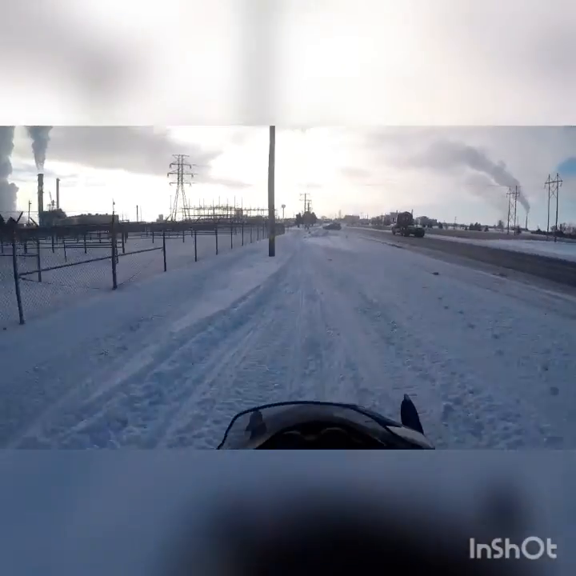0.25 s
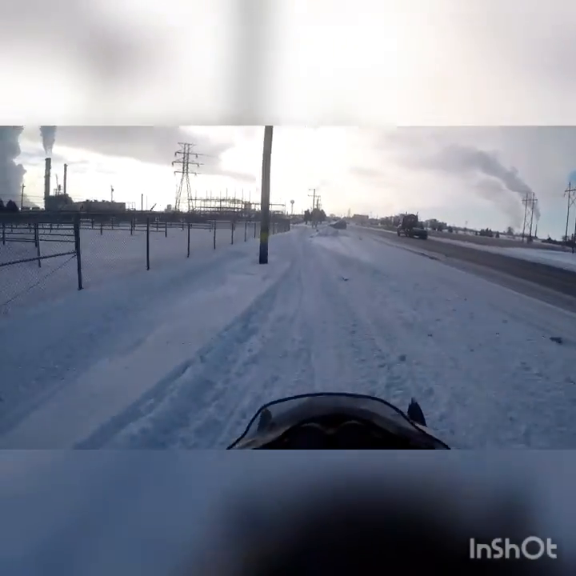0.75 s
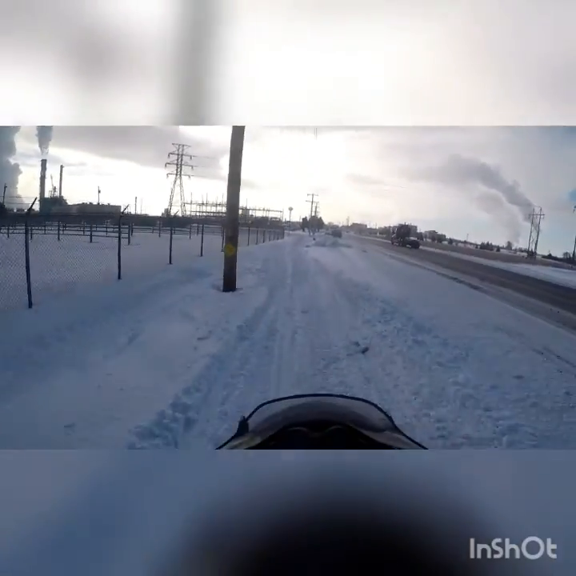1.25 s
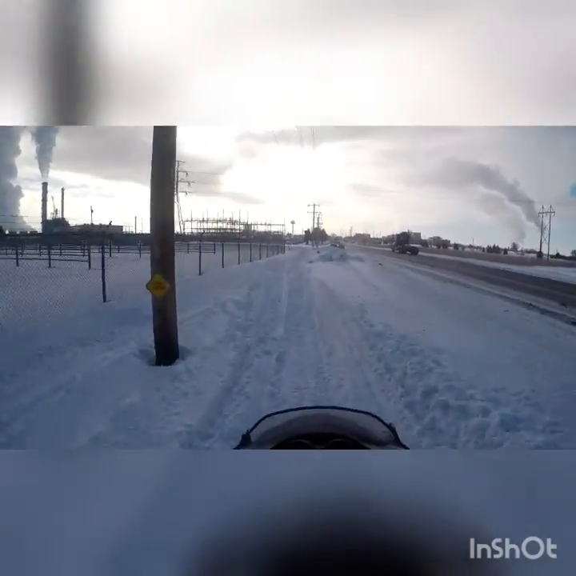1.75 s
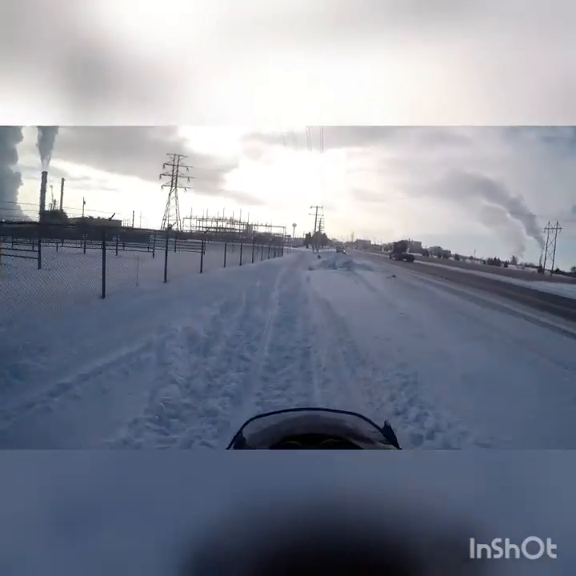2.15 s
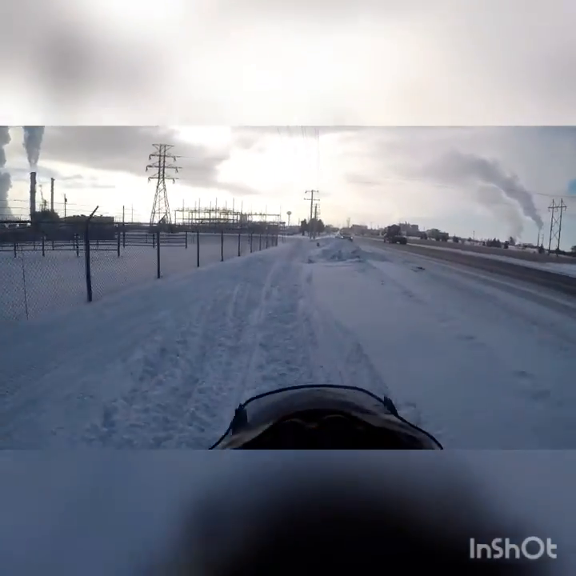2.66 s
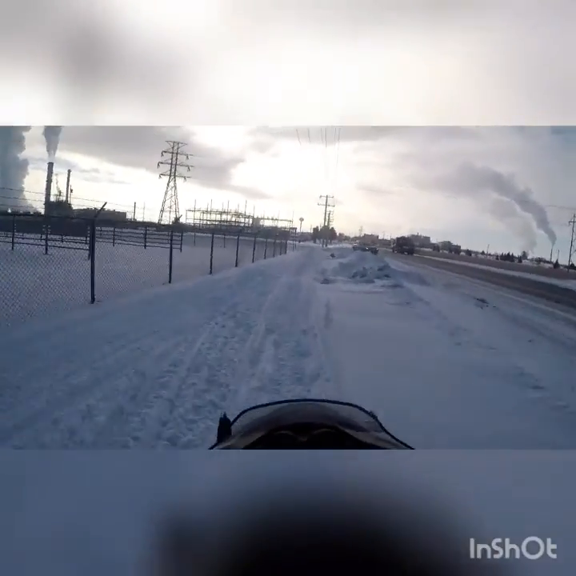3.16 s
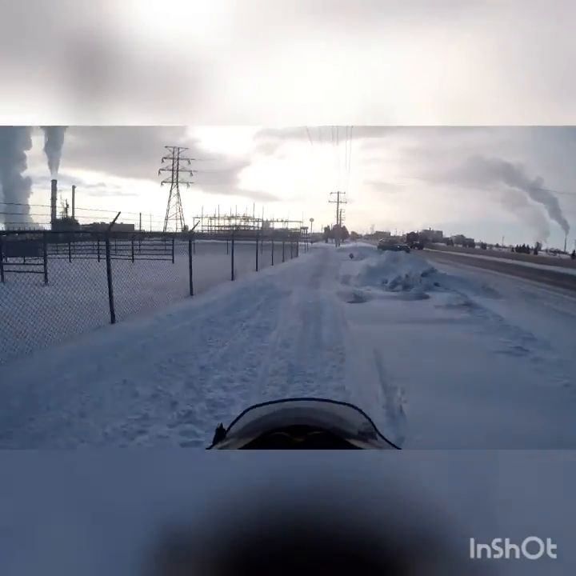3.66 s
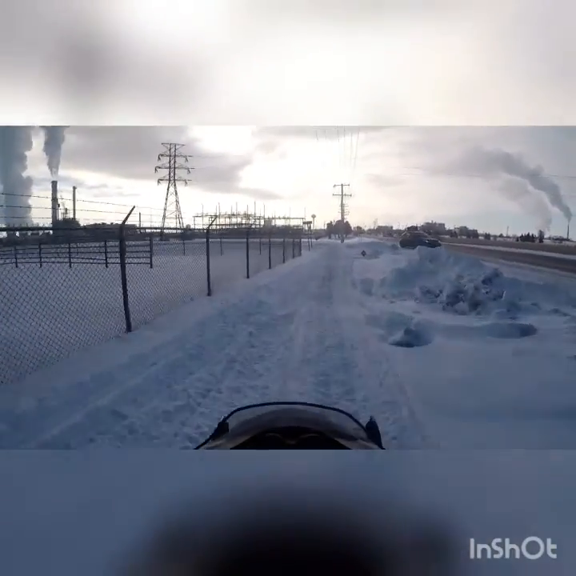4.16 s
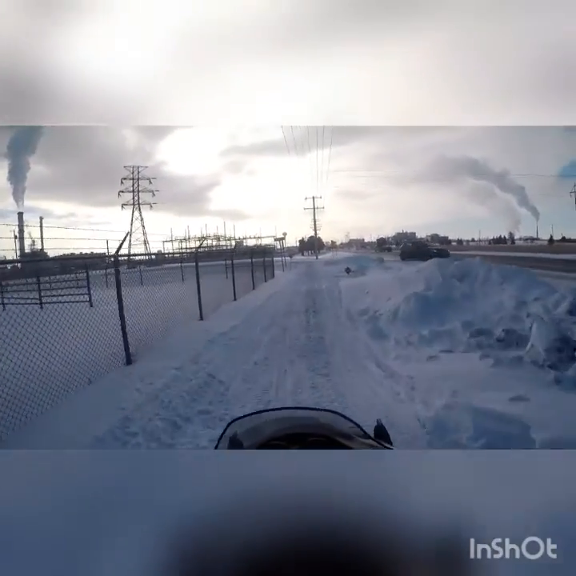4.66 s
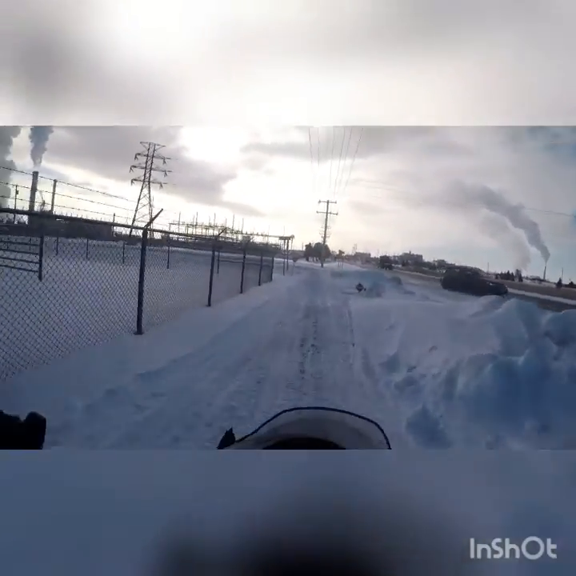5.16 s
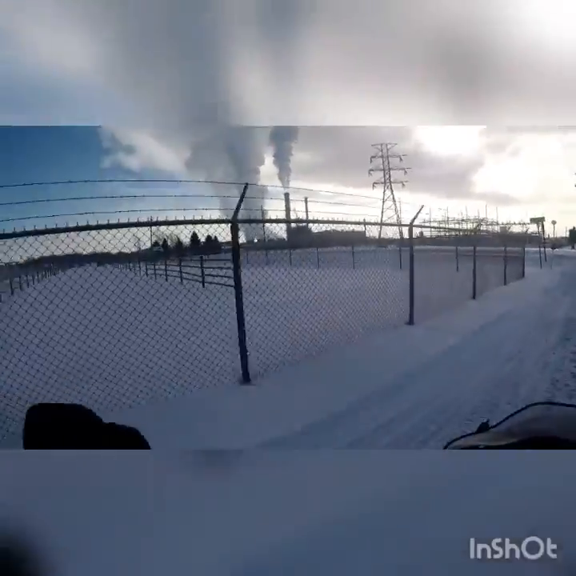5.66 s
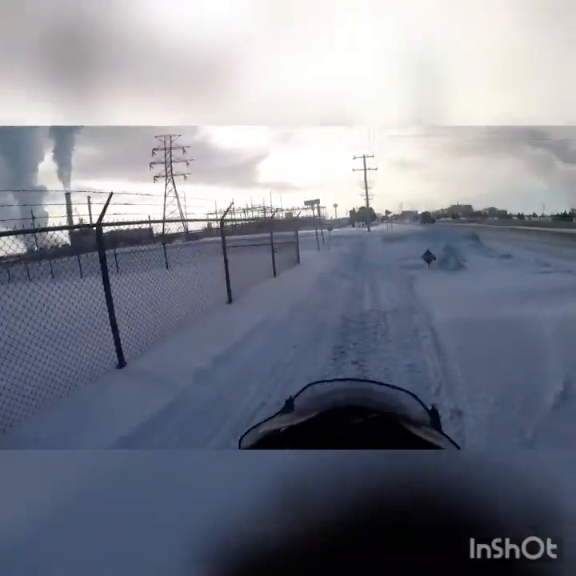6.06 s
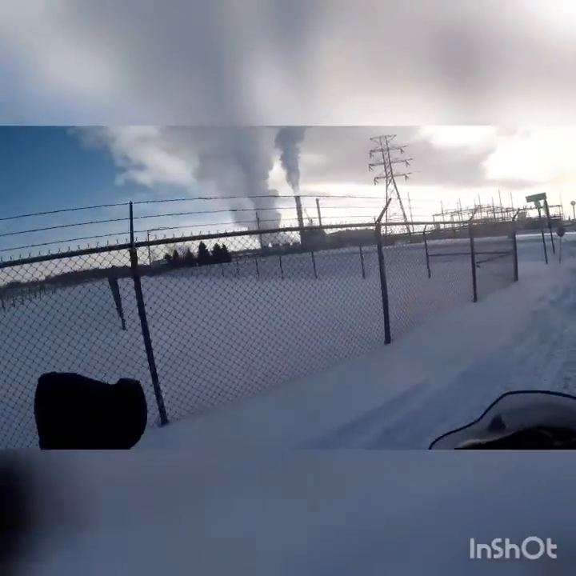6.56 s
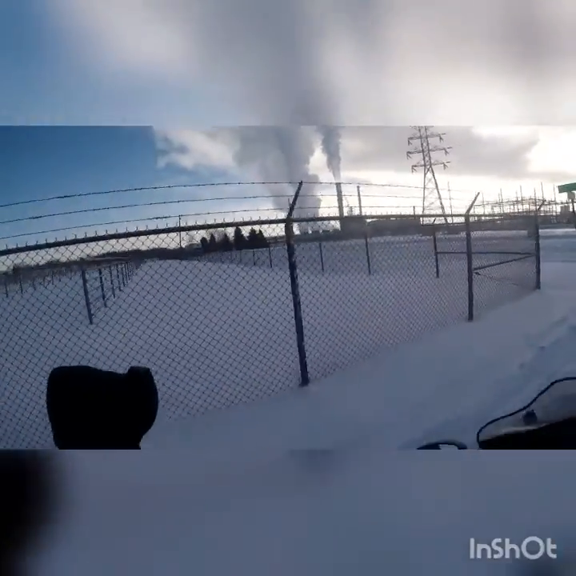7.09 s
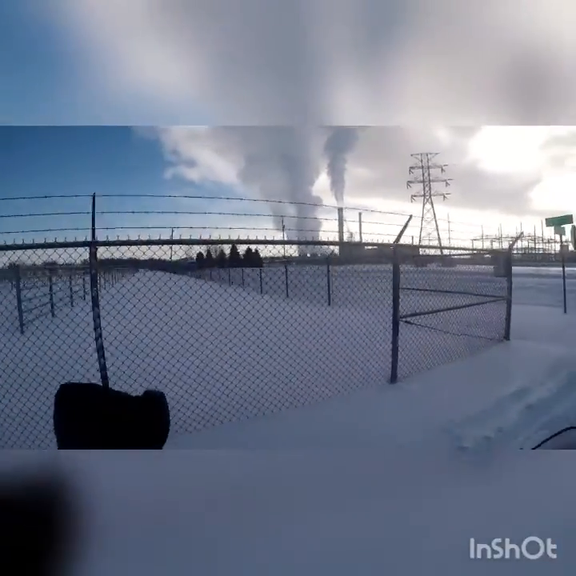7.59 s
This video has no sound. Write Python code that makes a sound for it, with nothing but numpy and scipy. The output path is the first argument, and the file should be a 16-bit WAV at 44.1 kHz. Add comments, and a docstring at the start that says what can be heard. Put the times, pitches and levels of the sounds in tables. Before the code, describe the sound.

Close onboard sound of a snowmobile on an open snowy trail. At first a thin, quiet, centred engine hum with faint track whine, rattle and snow hiss. Just after three seconds it opens into loud, wide stereo: the low exhaust throbs about ten times a second, the track clatters and clacks, and wind gusts rumble on the rider's microphone.

```python
"""A snowmobile's exhaust drones and throbs along a packed trail, heard close, from a camera worn by the rider.
The exhaust is a wavering near-sine firing note; the track adds noisy rattle, lug-locked whine and clacks.
Grainy noise hisses under the skis, brief low booms mark bumps, and gusts of low noise buffet the camera.
For three seconds the sound is thin and centred; then it opens into loud, wide stereo."""
import sys
import numpy as np
from scipy import signal
from scipy.fft import rfft, irfft, next_fast_len
from scipy.io import wavfile

SR = 44100
rng = np.random.default_rng(int(sys.argv[2]) if len(sys.argv) > 2 else 0)


def materialize(psi):
    """Save the field psi as 16-bit PCM at rate SR to the path in sys.argv[1].

    A 1-D psi becomes a single channel; in a 2-D psi each row is a channel.
    """
    bounded = np.clip(np.atleast_2d(psi).T, -1, 1)
    quanta = np.round(bounded * 32767).astype(np.int16)
    wavfile.write(sys.argv[1], SR, quanta)


N = 345303
TIME = np.arange(N) / SR
BIN_HZ = np.maximum(np.fft.rfftfreq(next_fast_len(N, True), 1 / SR), 1)

# Engine pitch, dipping and rising with the throttle: time_s, firing_hz
FIRING_PITCH = [(0, 113.8), (.75, 120.7), (1.4, 117.3), (1.87, 126.2), (2.13, 115.9), (2.4, 120.5),
                (3.3, 110.6), (3.9, 115.1), (4.27, 113.2), (4.6, 117.6), (5.0, 117), (5.23, 105.5),
                (5.45, 119.8), (5.7, 114), (5.97, 115.5), (6.27, 119.9), (6.5, 109.2), (6.9, 112.1),
                (7.25, 109.8), (7.83, 112)]
# Engine effort, before the thin or wide trim: time_s, level_db
ENGINE_EFFORT = [(0, -45), (1.65, -43), (1.9, -33.5), (2.25, -38), (2.9, -35.5), (3.33, -43.5),
                 (3.5, -26.5), (3.75, -28.5), (4.1, -23), (5.5, -22), (6.7, -21), (7.25, -20.5),
                 (7.83, -24)]


def exhaust(thin_db, wide_db, side_db, side_lag, second_db, half_db, idle_wobble, loud_wobble, idle_uneven_db):
    """A near-sine firing note with a faint half-order; it wavers while quiet, then firms up and throbs."""
    loud = opening()
    firing_hz, = in_time(FIRING_PITCH)
    effort_db, = in_time(ENGINE_EFFORT)
    wobble = idle_wobble + loud * (loud_wobble - idle_wobble)
    phase = 2 * np.pi * np.cumsum(firing_hz) / SR + wobble * drift(18.4)
    note = throb() * np.exp(1j * phase)
    half = from_db(half_db) * np.cos(phase / 2)
    second = from_db(second_db) * note ** 2
    mid = np.real(note + second) + half
    lagging = np.real(note * np.exp(-1j * side_lag))
    side = loud * from_db(side_db) * (lagging + half)
    trim_db = thin_db + loud * (wide_db - thin_db)
    uneven_db = (1 - loud) * idle_uneven_db * drift(19)
    return from_db(effort_db + trim_db + uneven_db) * left_right(mid, side)


# The loud exhaust's separate throbs: start_s, strength_db, depth_db of the dip each one starts from
EXHAUST_THROBS = [(3.39, 0, -6), (3.667, -3, -14), (3.761, 0, -12), (3.859, 2, -9), (3.965, -3, -10),
                  (4.044, 2.5, -17), (4.38, -3.5, -21), (4.448, -3.5, -7), (4.541, -1, -17),
                  (4.665, 1, -24), (4.764, .5, -28), (4.86, -3, -10), (4.945, 0, -12), (5.036, 2, -19),
                  (5.225, 0, -8), (5.317, .5, -17), (5.419, -.5, -26), (5.5, -.5, -22), (5.582, 1.5, -12),
                  (5.676, -1, -28), (5.737, -1, -11), (5.819, -1, -18), (5.911, 0, -15), (5.993, -1, -20),
                  (6.109, 0, -14), (6.215, -1, -9), (6.323, -1, -28), (6.428, .5, -16), (6.538, .5, -16),
                  (6.644, .5, -14), (6.747, .5, -9), (6.862, -.5, -16), (7.003, -.5, -14), (7.107, .5, -15),
                  (7.206, .5, -14), (7.332, -1, -10), (7.45, -2, -6), (7.559, 0, -7), (7.675, .5, -11),
                  (7.85, 0, -8)]
THROB_ROUND = 1.5  # higher is a flatter crest


def throb():
    """Two tones beating: each throb is a round crest, and the note turns over in the dip between two."""
    start_s, strength_db, depth_db = np.transpose(EXHAUST_THROBS)
    count = np.interp(TIME, start_s, np.arange(len(start_s)))
    crest = np.tanh(THROB_ROUND * np.sin(np.pi * count)) / np.tanh(THROB_ROUND)
    # the dip sits a quarter turn from the crest, so the note never quite vanishes
    dip = from_db(np.interp(TIME, start_s, depth_db)) * np.cos(np.pi * count)
    beating = from_db(strength_db[count.astype(int)]) * crest + 1j * dip
    onset = np.clip(2 * count, 0, 1)  # steady before the first throb
    return (1 - onset) * 1j + onset * beating


# Track speed: time_s, lugs_per_s
TRACK_SPEED = [(0, 226.7), (.3, 215), (.6, 205), (1.4, 193.5), (1.75, 195.3), (1.95, 205.3), (2.2, 203.3),
               (2.5, 206.5), (3.1, 196), (3.7, 193.5), (4, 185.3), (4.8, 174), (5.65, 164.7), (6, 169),
               (6.4, 170.7), (6.8, 175.3), (7.5, 169.3), (7.83, 171.3)]
# Strength of the track's whine, before the rails' boost: time_s, gain_db
WHINE_STRENGTH = [(0, 3.5), (.5, -11.5), (1.5, -15), (1.95, 2.5), (2.55, -5), (3.05, 2), (3.8, -7.5),
                  (4.5, -4), (5.55, -4), (6.3, -5), (6.75, -3), (7.83, -6)]
RAIL_WHINE_DB = 2.7  # hull and rails carry the whine more than the tunnel does
FLUTTER_DB, FLUTTER_PER_S = 0.7, 30  # the flapping track shakes rails and clatter together
# Level of the tunnel over the track, before the thin or wide trim: time_s, level_db
TUNNEL_LEVEL = [(0, -43.5), (1.3, -45.5), (3.1, -47), (3.3, -42), (3.6, -32), (4.25, -29.5), (4.85, -29),
                (5.05, -27.5), (5.55, -33), (5.85, -32), (6.3, -31.5), (6.8, -35.5), (7.2, -33),
                (7.5, -35.5), (7.83, -32)]
# Ringing of the rails' main mode against the rest: time_s, contrast_db
RAIL_MODE = [(0, -6), (.2, 7), (.45, -1), (1.2, 0), (2.1, -3), (2.5, 3), (3.1, -7), (3.3, 2.5),
             (3.55, -1.5), (5.25, -3), (5.7, 9.5), (6.15, 2), (6.4, 9), (6.68, 3.5), (6.9, 3.5),
             (7.25, 6.5), (7.83, 1.5)]
# The clatter's two resonances: time_s, lower_gain_db (near 1750 Hz), upper_gain_db (near 3000 Hz)
CLATTER_MODES = [(0, 3, 0.5), (1.2, 0, 1.5), (2.5, 1, -1.5), (3.1, -1, 0), (3.5, 1.5, 3.5), (4.25, 2, 1),
                 (5.1, 2.5, 2), (5.5, -2, -2), (5.95, 1, -1), (6.5, -5.5, 0.5), (7.25, 1.5, 0),
                 (7.83, 0.5, -4)]
# Lugs drumming on hard snow: time_s, level_db
LUG_DRUMMING = [(0, -67), (3.1, -79), (3.22, -36), (3.45, -31), (3.7, -28.5), (3.85, -32), (4.35, -35),
                (4.7, -37), (7.83, -52.5)]
# Spectra of each part, thin and centred or wide: frequency_hz, relative_db (per Hz)
HULL_THIN_COLOUR = [(75, -0.5), (100, -2), (125, 4), (150, -2), (190, -6.5), (215, -11.5), (245, -6.5),
                    (290, -13)]
HULL_WIDE_COLOUR = [(60, 0), (80, -1), (100, 1.5), (120, -2), (140, 2), (165, -6), (200, -2.5),
                    (240, -11.5), (290, -20.5)]
TUNNEL_THIN_COLOUR = [(290, 3.5), (330, 1.5), (375, -0.5), (430, 1.5), (470, -4.5), (520, -3), (590, -5.5),
                      (660, -5.5), (760, -8.5), (860, -4)]
TUNNEL_WIDE_COLOUR = [(290, -18), (338, -17.5), (375, -19), (430, 2.5), (470, -5.5), (520, 0.5), (590, -16),
                      (660, -4), (740, -15), (860, -8)]
RAILS_THIN_COLOUR = [(860, -23.5), (930, -4), (1000, -4), (1060, 3), (1110, 5.5), (1170, 0.5), (1240, 4.5),
                     (1300, 0.5), (1360, -7), (1420, -14.5)]
RAILS_WIDE_COLOUR = [(860, -12.5), (900, -9.5), (950, -9.5), (1010, -5.5), (1060, -2.5), (1110, 4.5),
                     (1170, 1), (1240, -4), (1300, -0.5), (1360, -9), (1420, -9.5)]
CLATTER_THIN_COLOUR = [(1420, -4), (1500, 0.5), (1600, 1.5), (1700, 0.5), (1800, -3.5), (1950, -5),
                       (2150, -5), (2450, -9.5), (2700, -4), (2950, -9), (3150, -17.5), (3500, -12),
                       (3900, -18.5), (4300, -18)]
CLATTER_WIDE_COLOUR = [(1420, -5), (1500, 2.5), (1600, 0.5), (1700, 2), (1800, -8.5), (1950, -13),
                       (2150, -6), (2450, -11.5), (2700, -15), (2950, -9), (3150, -13), (3500, -23.5),
                       (3900, -23), (4300, -31.5)]


def track():
    """The track's rattle and whine pass into hull, tunnel and rails; slaps add clatter and the lugs drum."""
    slap_db, flutter_db = slaps(), FLUTTER_DB * drift(FLUTTER_PER_S)
    hull_db = part_level(quiet_db=-45.0, loud_db=-30.5, follows=0.59, uneven_db=-0.34)
    rails_db = part_level(quiet_db=-41.5, loud_db=-26.5, follows=0.89, uneven_db=0.63)
    rails_db = rails_db + 0.62 * slap_db + flutter_db
    clatter_db = part_level(quiet_db=-51.0, loud_db=-38, follows=0.67, uneven_db=0.97)
    clatter_db = clatter_db + slap_db + 1.05 * flutter_db
    ring_db = in_time(RAIL_MODE)[0] + 1.1 * drift(UNEVEN_PER_S)

    turns = np.cumsum(in_time(TRACK_SPEED)[0]) / SR  # lugs passed so far
    whine = from_db(in_time(WHINE_STRENGTH)[0]) * track_whine(turns, flicker_db=3.5, wander=0.26)
    blows = clacks()
    soft = rattle(turns, slap=0.13, flutter_db=1.5) + whine
    hard = rattle(turns, slap=0.16, flutter_db=0.0) + blows + from_db(RAIL_WHINE_DB) * whine
    hard = ringing(hard, ring_db, hz=1083.0, width_hz=120)
    loose = rattle(turns, slap=0.091, flutter_db=-0.3) + blows + whine

    hull = from_db(hull_db) * heard(hard, HULL_THIN_COLOUR, HULL_WIDE_COLOUR, thin_db=3.5, wide_db=2.5)
    tunnel = heard(soft, TUNNEL_THIN_COLOUR, TUNNEL_WIDE_COLOUR, thin_db=-2.6, wide_db=-1.0)
    tunnel = from_db(in_time(TUNNEL_LEVEL)[0]) * tunnel
    rails = from_db(rails_db) * heard(hard, RAILS_THIN_COLOUR, RAILS_WIDE_COLOUR, thin_db=-3.0, wide_db=0.0)
    clatter = heard(loose, CLATTER_THIN_COLOUR, CLATTER_WIDE_COLOUR, thin_db=-0.52, wide_db=-0.86)
    clatter = from_db(clatter_db) * clatter
    lower_db, upper_db = in_time(CLATTER_MODES)
    clatter = lift(clatter, lower_db, hz=1774, width_hz=130)
    clatter = lift(clatter, upper_db, hz=3130, width_hz=1200)
    lugs = from_db(in_time(LUG_DRUMMING)[0] + drift(11)) * np.cos(2 * np.pi * turns)
    return hull + tunnel + rails + clatter + lugs + singing(turns)


def rattle(turns, slap, flutter_db):
    """Clips and wheels rattle unevenly, harder as each lug passes."""
    per_lug = 1 + slap * np.cos(2 * np.pi * turns)
    return rms_one(rng.standard_normal(N) * per_lug * from_db(flutter_db * drift(25)))


# Partials of the whine: multiple (of the three-lug pattern rate), level_db (against the rattle,
# before the strength curve)
WHINE_PARTIALS = [(8, -32.5), (10, -30), (15, -30), (16, -29.5), (17, -34), (18, -36), (19, -35), (20, -36),
                  (21, -34)]


def track_whine(turns, flicker_db, wander):
    """The repeating lug pattern sounds a row of partials, each wavering on its own."""
    pattern = 2 * np.pi * turns / 3  # the pattern repeats every three lugs
    whine = 0
    for multiple, level_db in WHINE_PARTIALS:
        phase = round(multiple) * pattern + wander * drift(11) + rng.uniform(0, 2 * np.pi)
        gain = np.sqrt(2) * from_db(level_db + flicker_db * drift(13.0))
        whine = whine + gain * np.cos(phase)
    return whine


# The track slaps its rails: peak_s, extra_rattle_db, clack_db
TRACK_SLAPS = [(2.8, 7, 5), (3.408, 5.5, 12), (3.605, -1.5, 7.5), (4.222, 6, 25), (4.25, 5.5, 21),
               (4.275, 0.5, 9), (4.389, 2.5, 16.5), (4.57, 0, 26.5), (4.755, 5, 14), (5.012, 6.5, 15.5),
               (5.036, 1.5, 7), (5.188, 6.5, 15), (5.247, 4.5, 25.5), (5.311, -3, 27), (5.828, 2.5, 17),
               (5.955, 8, 20), (6.154, 2, 15), (6.832, -2, 13), (7.264, 4, 17.5), (7.775, 4.5, 13)]
SLAP_ATTACK_S, SLAP_DECAY_S = 0.0019, 0.018  # rise time, and fade to 1/e


def slaps():
    """Each slap changes the rattle's level quickly, mostly upward, then dies away; in dB."""
    total_db = 0
    for peak_s, extra_db, _ in TRACK_SLAPS:
        since = TIME - peak_s
        attack = np.clip(since / SLAP_ATTACK_S + 1, 0, 1)
        total_db = total_db + extra_db * attack * np.exp(-np.abs(since) / SLAP_DECAY_S)
    return total_db


CLACKS_PER_S, CLACK_DB, CLACK_SPREAD_DB = 45, 16, -0.5  # metal clips clacking between the slaps


def clacks():
    """Sharp blows on the rails: small ones at random, a further one with each slap."""
    strike = rng.random(N) < CLACKS_PER_S / SR
    blows = strike * from_db(CLACK_DB + CLACK_SPREAD_DB * rng.standard_normal(N))
    for peak_s, _, clack_db in TRACK_SLAPS:
        blows[int(peak_s * SR)] += from_db(clack_db)
    return blows


def ringing(force, ring_db, hz, width_hz):
    """The rails' main mode gains or loses against the rest."""
    mode = shaped(force, np.exp(-((BIN_HZ - hz) / width_hz) ** 2))
    return mode * from_db(ring_db / 2) + (force - mode) * from_db(-ring_db / 2)


def lift(x, db, hz, width_hz):
    """One resonance grows or shrinks while the rest stays."""
    return x + (from_db(db) - 1) * shaped(x, np.exp(-((BIN_HZ - hz) / width_hz) ** 2))


# Clear tones of track and wheels: loudest_s, half_length_s, multiple (of the three-lug pattern rate),
# level_db, side_minus_mid_db (once wide)
CLEAR_TONES = [(.05, .15, 7, -57, 0), (.05, .3, 2.07, -43, 0), (.15, .25, 15, -49, 0),
               (.15, .25, 9, -58, 0), (.75, .18, 2.1, -42, 0), (.8, .25, 4.13, -52, 0),
               (.9, .25, 9, -60, 0), (1.5, .3, 3.77, -47, 0), (1.75, .2, 2.55, -45, 0),
               (2.25, .36, 9, -54.5, 0), (2.45, .22, 15, -48.5, 0), (2.5, .2, 3, -47, 0),
               (2.9, .3, 3.77, -51, 0), (3.6, .2, 9, -46, 18), (3.8, .2, 3.77, -43, -5),
               (4.05, .35, 7, -36.5, 23), (4.2, .2, 1.14, -33, -3), (4.6, .55, 6, -41, 10),
               (4.8, .3, 9, -43, 15), (5.1, .3, 3.77, -38, -5), (6.05, .35, 3.77, -38, -5),
               (6.05, .2, 9, -41, 17), (6.3, .7, 6, -43.5, 11), (6.65, .13, 19, -27, 11),
               (6.7, .4, 9, -39, 12), (6.7, .4, 1.14, -37, -3), (6.8, .5, 4.13, -42, -4),
               (6.9, .5, 8, -42, 21), (7.55, .4, 3, -34, 0), (7.7, .3, 3.77, -40, -5),
               (7.75, .25, 6, -43, 11), (7.8, .25, 9, -37, 20)]
# unsteadiness in level (dB) and phase (rad), and its pace
TONE_FLICKER_DB, TONE_WANDER, TONE_WANDER_PER_S = 1.7, 0.26, 13


def singing(turns):
    """Wavering tones locked to the track's speed swell and fade, spreading out as the sound opens."""
    centred, mid, side = 0, 0, 0
    for loudest_s, half_length_s, multiple, level_db, side_db in CLEAR_TONES:
        phase = 2 * np.pi * multiple * turns / 3 + TONE_WANDER * drift(TONE_WANDER_PER_S)
        gain = np.sqrt(2) * from_db(level_db + TONE_FLICKER_DB * drift(TONE_WANDER_PER_S))
        swell = np.exp(-((TIME - loudest_s) / half_length_s) ** 2 / 2)
        tone = gain * swell * np.cos(phase)
        angle = np.arctan(from_db(side_db))  # shares the power between mid and side
        centred = centred + tone
        mid = mid + np.cos(angle) * tone
        side = side + np.sin(angle) * tone
    lead, share = in_frequency(STEREO_WIDTH)[2], opening()
    wide = left_right(mid, shaped(side, np.exp(1j * lead)))
    return (1 - share) * centred + share * wide


# Load on the track as the trail rolls: time_s, load_db (each part follows a share of it)
TRAIL_LOAD = [(0, 3), (.3, 2), (.6, 2), (.8, 3.5), (1.2, 0.5), (1.95, 1.5), (2.2, -0.5), (2.45, 4),
              (3.02, -2.5), (3.4, -0.5), (3.6, 2.5), (3.75, -2), (4.25, -0.6), (5.2, 0), (6.1, 1.5),
              (6.65, 2), (7.6, 2), (7.83, 4)]
SWELL_START_S, SWELL_S = 3.164, 0.54  # hull, rails and clatter grow loud over this stretch
UNEVEN_PER_S = 8.8  # how fast the trail shakes each part's level


def part_level(quiet_db, loud_db, follows, uneven_db):
    """A part's level in dB: it swells from quiet to loud, follows the load and varies with the trail."""
    swell = np.clip((TIME - SWELL_START_S) / SWELL_S, 0, 1)
    level_db = quiet_db + swell * (loud_db - quiet_db)
    return level_db + follows * in_time(TRAIL_LOAD)[0] + uneven_db * drift(UNEVEN_PER_S)


# Snow hissing under the skis, before the thin or wide trim: time_s, level_db
SNOW_HISS = [(0, -46), (.3, -49), (1.2, -50.5), (1.5, -52), (1.85, -49.5), (2.1, -51.5), (2.6, -50),
             (3.1, -52.5), (3.8, -52), (5.2, -53), (5.5, -54.5), (6.2, -52.5), (7.83, -55)]
# The camera's microphone ringing near 5.8 kHz, fading away as the sound opens: time_s, level_db
MIC_RING = [(0, -38.5), (.15, -45.5), (.3, -50.5), (.8, -50), (1.7, -56.5), (2.2, -62), (3.2, -80),
            (3.7, -86.5), (7.83, -75.5)]
# Spectra of the hiss, thin and centred or wide: frequency_hz, relative_db (per Hz)
SNOW_THIN_COLOUR = [(4300, -17), (4800, -16), (5300, -15), (5650, -4.5), (6000, -4), (6500, -6.5),
                    (7000, -10.5), (7550, -16.5), (8200, -15), (9500, -18), (11000, -27), (12500, -27.5),
                    (14000, -38), (15000, -31.5)]
SNOW_WIDE_COLOUR = [(4300, -7.5), (4800, -1), (5300, -1), (5650, -1.5), (6000, 3.5), (6500, -2.5),
                    (7000, -7), (7550, 0), (8200, -10.5), (9500, -11.5), (11000, -19.5), (12500, -23),
                    (14000, -27.5), (15000, -40.5)]


def skis():
    """Snow hisses in fine grains, spurting with the slaps, and the camera's microphone rings faintly near 5.8
    kHz."""
    snow_db = in_time(SNOW_HISS)[0] + 0.87 * drift(UNEVEN_PER_S) + 0.8 * slaps()
    grain_db = 0.74 * drift(120) + 0.54 * drift(9.6)
    grains = rms_one(rng.standard_normal(N) * from_db(grain_db))
    hiss = heard(grains, SNOW_THIN_COLOUR, SNOW_WIDE_COLOUR, thin_db=-2.0, wide_db=0.0, fade_s=0.49)
    ring = resonance(resonance(rng.standard_normal(N), 5890, 530), 5710, 530)
    return from_db(snow_db) * hiss + from_db(in_time(MIC_RING)[0]) * ring


# Bumps in the trail: peak_s, level_db (on the left once wide; 6 dB less per channel while centred)
TRAIL_BUMPS = [(0.85, -30), (3.609, -19.5), (7.181, -18)]


def bumps(hz, width_hz, length_s):
    """The hull booms briefly as the skis hit a rut: centred at first, on the left once wide."""
    blows = sum(from_db(level_db) * np.exp(-((TIME - peak_s) / length_s) ** 2)
                for peak_s, level_db in TRAIL_BUMPS)
    boom = blows * resonance(resonance(rng.standard_normal(N), hz, width_hz), hz, width_hz)
    return left_right(boom, boom * opening()) / 2


# Wind on the camera, before the thin or wide trim: time_s, level_db
WIND_GUSTS = [(0, -27), (.2, -40), (.4, -31.5), (1.1, -37), (1.75, -32.5), (2.05, -30), (2.4, -28),
              (2.65, -33.5), (3.36, -30), (3.55, -22), (4.25, -24), (4.45, -21.5), (5.28, -17.5),
              (5.5, -22.5), (6.4, -20.5), (6.9, -28), (7.25, -20), (7.83, -24.5)]
# Spectrum of the wind: frequency_hz, relative_db (per Hz)
WIND_COLOUR = [(8, 3.5), (20, -11.5), (33, 0.5), (42, -6.5), (52, -16.5), (68, -23), (85, -24.5)]


def wind():
    """Gusts rumble on the camera: low noise that rises and falls."""
    gust_db = in_time(WIND_GUSTS)[0] + 1.4 * drift(UNEVEN_PER_S)
    rumble = heard(rng.standard_normal(N), WIND_COLOUR, WIND_COLOUR, thin_db=-0.2, wide_db=-1.4)
    return from_db(gust_db) * rumble


# How far the sound has opened: time_s, share (0 centred, 1 wide)
STEREO_OPENING = [(3.12, 0), (3.3, 0.78), (3.5, 0.98), (3.7, 0.97)]


def opening():
    """0 while the sound is centred, near 1 once it is wide."""
    return np.clip(in_time(STEREO_OPENING)[0], 0, 1)


# Stereo width at the camera: frequency_hz, side_minus_mid_db, tied_share (of side tied to mid),
# lead_rad (side ahead of mid)
STEREO_WIDTH = [(30, -4.5, 0.66, 5), (65.7, -20, 0.63, -6.5), (118, -2.5, 0.52, 0), (188, 3.5, 0.3, 1),
                (250, 3, 0.41, 0.7), (320, 27.5, 0.28, 3), (417, 22.5, 0.28, 2.05), (960, 25.5, 0.83, 1.6),
                (1094, 14.5, 0.61, 1), (1358, 3.5, 0.78, 1.8), (1730, -5, 0.39, 2), (2240, 10, 0.78, 5),
                (2750, 0, 0.41, 3.5), (3300, 1.5, 0.43, 4.5), (4480, 4.5, 0.55, 7.5), (6000, 2, 0.28, 7),
                (12000, -1.5, .2, 16.5)]


def heard(force, thin, wide, thin_db, wide_db, fade_s=0.084):
    """A vibration in its centred colour, fading over to its wide stereo colour."""
    side_db, tied, lead = in_frequency(STEREO_WIDTH)
    tied, width = np.clip(tied, 0, 1), from_db(side_db)
    share = opening() * np.clip((TIME - STEREO_OPENING[0][0]) / fade_s, 0, 1) ** 2
    response = colour(wide) / np.hypot(1, width)
    side = shaped(force, response * width * np.exp(1j * lead))
    loose_mid = shaped(rng.standard_normal(N), response * np.sqrt(1 - tied ** 2))  # independent of side
    mid = shaped(force, response * tied) + loose_mid
    centred = from_db(thin_db) * rms_one(shaped(force, colour(thin)))
    spread = from_db(wide_db) * rms_one(left_right(mid, side))
    return np.sqrt(1 - share) * centred + np.sqrt(share) * spread


def left_right(mid, side):
    """Two channels from mid and side."""
    return np.array([mid + side, mid - side])


def from_db(db):
    """Decibels to gain."""
    return 10 ** (np.asarray(db) / 20)


def rms_one(x):
    """Scale to unit power."""
    return x / np.sqrt(np.mean(x ** 2) + 1e-20)


def in_time(rows):
    """The columns of a curve at every sample."""
    s, *columns = np.transpose(rows)
    return [np.interp(TIME, s, c) for c in columns]


def in_frequency(rows):
    """The columns of a spectrum at every frequency bin."""
    hz, *columns = np.transpose(rows)
    return [np.interp(np.log(BIN_HZ), np.log(hz), c) for c in columns]


def shaped(x, response):
    """Filter x by a frequency response."""
    size = next_fast_len(N, True)
    return irfft(rfft(x, size) * response, size)[..., :N]


def drift(rate):
    """Slow random wander of unit power; a higher rate (Hz) wanders faster."""
    step = 40  # samples between the slow points
    r = np.exp(-2 * np.pi * rate * step / SR)
    noise = rng.standard_normal(N // step + 2002)
    slow = signal.lfilter([1], [1, -2 * r, r * r], noise)[2000:]  # drop the settling
    return np.interp(np.arange(N) / step, np.arange(len(slow)), rms_one(slow))


def resonance(x, hz, width_hz):
    """A two-pole resonance; unit power."""
    r = np.exp(-np.pi * width_hz / SR)
    return rms_one(signal.lfilter([1, 0, -1], [1, -2 * r * np.cos(2 * np.pi * hz / SR), r * r], x))


def colour(spectrum):
    """Response of a spectrum that falls steeply past its ends."""
    low, high = spectrum[0][0], spectrum[-1][0]
    octaves_outside = np.maximum(0, np.maximum(np.log2(low / BIN_HZ), np.log2(BIN_HZ / high)))
    return from_db(in_frequency(spectrum)[0] - 200 * octaves_outside)


def scene():
    """Engine, track, skis, bumps and wind together."""
    engine = exhaust(thin_db=3.5, wide_db=5.5, side_db=5.0, side_lag=0.43, second_db=-36.0, half_db=-28,
                     idle_wobble=0.48, loud_wobble=0.31, idle_uneven_db=1.5)  # lag and wobbles in rad
    return engine + track() + skis() + bumps(hz=148, width_hz=62, length_s=0.017) + wind()


def record(dry):
    """The highest peaks are rounded below 0.85 and the top is cut."""
    rounded = dry / (1 + (dry / 0.85) ** 6) ** (1 / 6)
    # 70 dB down from 15.8 kHz up
    return signal.sosfilt(signal.cheby2(16, 70, 15800, fs=SR, output="sos"), rounded)


dry = scene()
out = record(dry)
materialize(out)
```